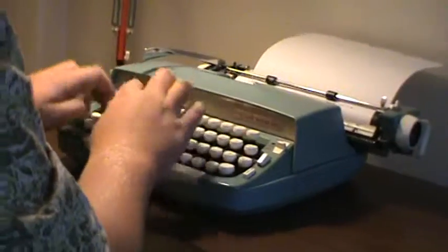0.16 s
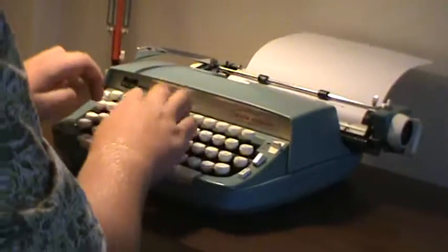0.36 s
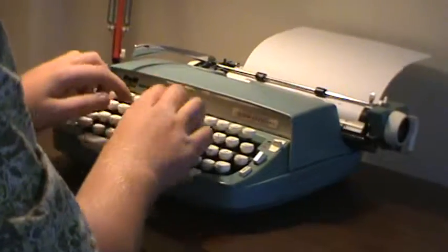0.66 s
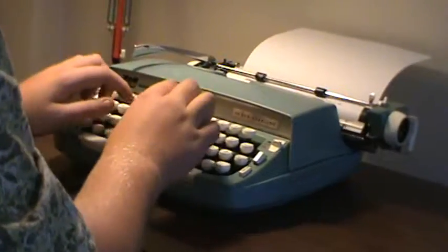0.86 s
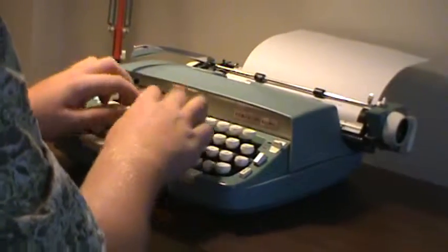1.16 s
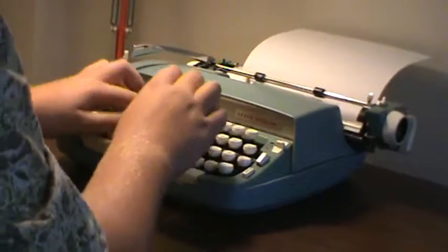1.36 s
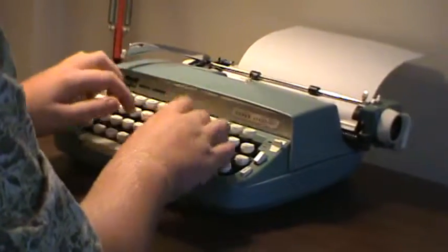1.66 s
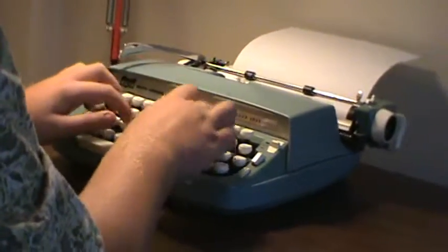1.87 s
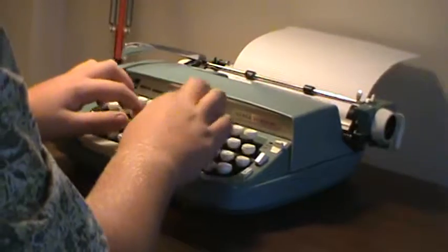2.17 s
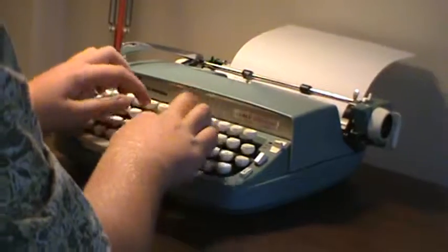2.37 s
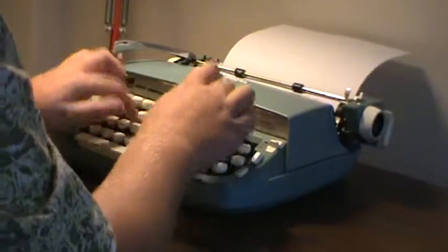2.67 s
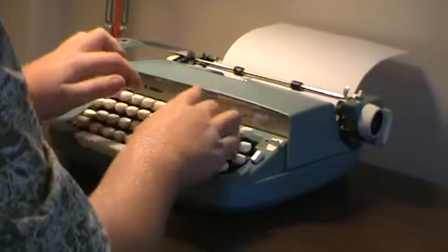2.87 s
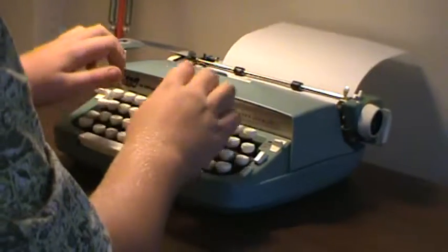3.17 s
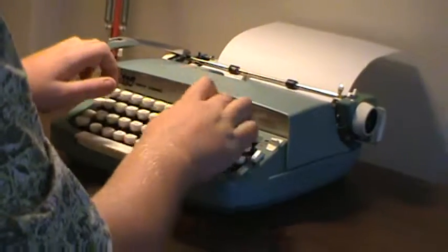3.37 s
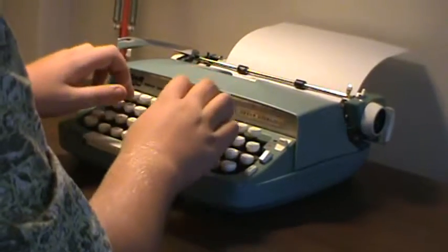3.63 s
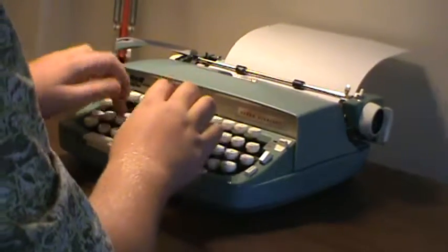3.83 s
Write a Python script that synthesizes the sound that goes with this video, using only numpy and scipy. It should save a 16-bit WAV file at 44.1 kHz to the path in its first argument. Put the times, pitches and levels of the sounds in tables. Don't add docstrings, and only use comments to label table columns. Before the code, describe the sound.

A manual typewriter typed briskly, sharp type slaps with lighter key ticks and carriage clicks between them, two short gaps early, then a steady run that thins near the end; close microphone, small room.

```python
import sys
import numpy as np
from scipy import signal
from scipy.fft import rfft, irfft
from scipy.io import wavfile
from scipy.ndimage import uniform_filter1d, minimum_filter1d

SR = 44100
rng = np.random.default_rng(int(sys.argv[2]) if len(sys.argv) > 2 else 0)


def amplitude_ratio(level_db):
    exponent = np.asarray(level_db, float) / 20
    return 10 ** exponent


def transcribe(signal):
    frames = np.atleast_2d(signal).T
    limited = np.clip(frames, -1, 1)
    pcm = np.round(limited * 32767).astype(np.int16)
    wavfile.write(sys.argv[1], SR, pcm)


N = 176400


def read(points, hz):
    f, value = np.transpose(points)
    return np.interp(np.log(hz + 1), np.log(f + 1), value)


def add(mix, s, sound):
    part = mix[max(round(s * SR), 0):][:len(sound)]
    part += sound[:len(part)]


def colour(x, points):
    hz = abs(np.fft.fftfreq(2048, 1 / SR))
    log_gain = np.log(amplitude_ratio(read(points, hz)))
    minimum_phase = np.exp(np.conj(signal.hilbert(log_gain)))
    taps = np.fft.ifft(minimum_phase).real
    return signal.oaconvolve(x, taps / np.linalg.norm(taps))[:len(x)]


def burst(t60, rise=0.0001, hold=0., size=3000):
    t = np.arange(size) / SR
    shape = np.minimum(t / rise, 1) * amplitude_ratio(-60 * np.maximum(t - hold, 0) / t60)
    x = rng.standard_normal(size) * shape
    for _ in range(6):
        z = rfft(x)
        x = irfft(z / np.sqrt(uniform_filter1d(abs(z) ** 2, size=9) + 1e-20), size)
        x = x / np.sqrt(abs(uniform_filter1d(x ** 2, size=40)) + 1e-12) * shape
    return x / np.linalg.norm(x)


def ring(modes, detune=0.011, vary_db=2.0, size=9000):
    t = np.arange(size) / SR
    out = np.zeros(size)
    for hz, db, t60 in modes:
        louder, sharper, sign = rng.standard_normal(3)
        decay = amplitude_ratio(db + vary_db * louder - 60 * t / min(t60, 0.4))
        out += decay * np.sin(2 * np.pi * hz * (1 + detune * sharper) * t) * np.sign(sign)
    return out


# (t/s, level/dB)
SLAPS = [(0.016, -20.6), (0.2337, -20.0), (0.3021, -21.6), (0.4509, -19.5), (1.0856, -22.5),
         (1.2506, -21.0), (1.3837, -21.3), (1.6988, -23.0), (1.8689, -21.5), (2.0085, -19.6),
         (2.1274, -21.5), (2.2972, -20.0), (2.389, -22.5), (2.511, -19.5), (2.6289, -24.9), (2.7517, -20.1),
         (2.9073, -22.2), (3.0229, -24.6), (3.3778, -29.9), (3.8225, -19.1)]
# (f/Hz, level/dB)
SLAP = [(120, -34), (250, -30), (900, -21), (2900, -13.5), (4800, -6), (5900, -0.5), (8700, -3),
        (10300, -11), (15700, -29), (16500, -47)]
# (f/Hz, level/dB)
TICK = [(120, -32), (220, -11), (500, -6.5), (1200, -2), (2300, -1), (5000, 1), (11000, 0), (15800, -16),
        (16500, -59)]
# (f/Hz, level/dB)
STEP = [(120, -47.5), (250, -24), (900, -14.5), (4670, -6.5), (5830, 6), (9250, 0), (14000, -20),
        (16400, -59)]
# (f/Hz, level/dB, T60/s)
CASE = [(156, -17.5, 0.13), (227, -14, 0.081), (353, -9.5, 0.08), (466.5, -5, 0.065), (542, -3.5, 0.083),
        (699, -5, 0.072), (980, 1.5, 0.0083), (1235, 1.5, 0.021), (1524, 8.5, 0.016), (2138.4, 5.5, 0.0067)]


def type_bars():
    swing_s, step_s, step_end_s, thump_s = 0.0048, 0.031, 0.066, 0.054
    desk = [(60.7, 0, 0.2)]  # f/Hz, level/dB, T60/s
    slap, tick, step, body = np.zeros((4, N))
    t = np.arange(3000) / SR
    step_gate = np.clip((step_end_s - step_s - t) / 0.0054, 0, 1)
    for s, db in SLAPS:
        add(slap, s, amplitude_ratio(db + 37.5) * burst(0.016, rise=0.0001, hold=0.0012))
        add(tick, s - swing_s, amplitude_ratio(db + 18) * burst(0.027, rise=0.0029))
        step_db = 1.87 * db + 45.5
        add(step, s + step_s, amplitude_ratio(step_db) * burst(0.21, rise=0.0039) * step_gate)
        add(body, s + step_s, amplitude_ratio(-37.5) * ring(CASE))
        add(body, s + thump_s, amplitude_ratio(-50) * ring(desk, detune=0.059))
    return colour(slap, SLAP) + colour(tick, TICK) + colour(step, STEP) + body


# (t/s, tick level/dB, case level/dB)
KEYS = [(0.0014, -10, -29), (0.1303, -22.5, -49), (0.1917, -14.5, -49), (0.2233, -43, -26.5),
        (0.4038, -16, -39), (0.5732, -25, -36), (0.6233, -17.5, -28.5), (1.044, -14.5, -36.5),
        (1.0718, -19, -49), (1.2076, -20, -29.5), (1.3489, -18, -37.5), (1.5092, -15, -33),
        (1.66, -12.5, -37), (1.6858, -13, -30), (1.8346, -14.5, -35), (1.9686, -19, -36.5),
        (2.0913, -37, -55), (2.2406, -15, -52), (2.3508, -23, -39), (2.4736, -21, -36.5),
        (2.5909, -21, -41.5), (2.7175, -15.5, -38), (2.8618, -13.5, -36), (3.3074, -17, -36),
        (3.3482, -20.5, -38), (3.4972, -29.5, -32.5), (3.5049, -20.5, -36.5), (3.7859, -14.5, -35.5),
        (3.8128, -34, -51), (3.9494, -25, -39)]


def keys():
    tick, body = np.zeros((2, N))
    for s, db, case_db in KEYS:
        add(tick, s, amplitude_ratio(db + 10) * burst(0.045, rise=0.0014))
        add(body, s, amplitude_ratio(case_db - 8.5) * ring(CASE, detune=0.08))
    return colour(tick, TICK) + body


# (t/s, clack level/dB, low ring level/dB, high ring level/dB)
BARS = [
    (.6945, -2.5, -28.5, -23.5),
    (1.5816, -4, -35, -24),
]
# (f/Hz, level/dB, T60/s)
BAR = [(2010, -2, .03), (2120, -2, .08), (2210, -2, .02), (2345, -5, .03), (3590, -12, .02),
       (3900, -9, .015), (4350, 2, .018), (4670, -5, .02), (4810, 1, .014), (7520, 0, .01)]


def space_bar():
    out = np.zeros(N)
    for s, db, low_db, high_db in BARS:
        clack = amplitude_ratio(db) * colour(burst(0.0384, size=9000), TICK)
        low = amplitude_ratio(low_db) * ring(BAR[:4], detune=0.0034, vary_db=1)
        high = amplitude_ratio(high_db) * ring(BAR[4:], detune=0.0033, vary_db=1)
        add(out, s, clack + low + high)
    return out


# (t/s, level/dB)
PINGS = [
    (0.143, -24),
    (3.153, -14),
]
# (f/Hz, level/dB, T60/s)
SPRING = [(11300, 0, .02), (10900, -2, .012), (11550, -5, .012)]


def spring():
    out = np.zeros(N)
    for s, db in PINGS:
        add(out, s, amplitude_ratio(db - 18) * ring(SPRING, detune=0.003))
    return out


# (f/Hz, level/dB)
RATTLE = [(1000, -28), (3000, -12), (8000, -2), (11000, 1.5), (15500, -9), (16500, -32)]


def rattle():
    from_s, to_s, ticks_per_s = 0.072, 0.16, 180
    busy = np.zeros(N)
    for s, _ in SLAPS:
        add(busy, s + from_s, np.hanning(round((to_s - from_s) * SR)))
    tick_db = -22 + 3.76 * np.minimum(rng.exponential(1, N), 4)
    size = amplitude_ratio(tick_db) * rng.choice([-1., 1.], N)
    ticks = size * np.minimum(busy, 1) * (rng.random(N) < ticks_per_s / SR)
    return colour(signal.oaconvolve(ticks, burst(0.0054, size=300))[:N], RATTLE)


# (f/Hz, side level/dB)
WIDTH = [(60, -36), (110, -31), (200, -21), (380, -15), (700, -11), (1290, -5.5), (2380, -5), (4400, -6.5),
         (8120, -2), (15000, -11)]


def stereo(mid, side):
    hz = np.fft.rfftfreq(len(side), 1 / SR)
    side = irfft(rfft(side) * amplitude_ratio(read(WIDTH, hz)), len(side))
    return np.array([mid + side, mid - side])


# (t/s, level/dB, side share, positive to the left)
ECHOES = [(.0063, .5, .3), (.0123, -.5, -.35), (.0142, -3, .35), (.0195, -5, -.35), (.0220, -.5, .3),
          (.0298, -3, -.3), (.0365, -5, .35)]
# (f/Hz, T60/s)
ROOM = [(60, 0.29), (400, 0.62), (1500, 0.55), (6000, .44), (9000, 0.38), (15000, 0.098)]
# (f/Hz, level/dB)
WALLS = [(200, 9.5), (3000, 6), (6000, 4), (9000, -3), (15000, 6)]


def room(x):
    rise_s, tail_db = 0.011, 3
    hz, t, z = signal.stft(rng.standard_normal((2, SR)), SR, nperseg=256)
    decay = amplitude_ratio(-60 * t / read(ROOM, hz)[:, None])
    tail = signal.istft(z * decay, SR, nperseg=256)[1][:, :SR]
    tail *= 1 - np.exp(-(np.arange(SR) / SR / rise_s) ** 2)
    tail *= amplitude_ratio(tail_db) / np.linalg.norm(tail[0])
    for s, db, side in ECHOES:
        tail[:, round(s * SR)] += amplitude_ratio(db) * np.array([1, side * 2])
    mid, side = signal.fftconvolve(colour(x, WALLS)[None], tail, axes=1)[:, :N]
    return x + stereo(mid, side)


# (f/Hz, level/dB)
HUSH = [(24, -15), (40, 8), (329, -9), (765, -8.5), (1030, -9), (1200, -18), (5700, -18), (7490, -20),
        (15000, -22)]


def hush():
    gain = amplitude_ratio(read(HUSH, np.fft.rfftfreq(N, 1 / SR)))
    x = irfft(rfft(rng.standard_normal((2, N))) * gain, N)
    mid, side = x / x[0].std()
    return amplitude_ratio(-57.5) * stereo(mid, side)


def scene():
    ring_wet = amplitude_ratio(-3)
    desk = type_bars() + keys() + rattle()
    rings = space_bar() + spring()
    return room(desk + ring_wet * rings) + (1 - ring_wet) * rings + hush()


def roll_off(x):
    return signal.sosfilt(signal.butter(12, 16520, fs=SR, output="sos"), x)


def record(dry):
    ceiling_db, ratio, recover_db_per_s = -13, 8, 336
    ahead, hold = round(0.0026 * SR), round(0.002 * SR)
    power = abs(uniform_filter1d((dry ** 2).max(0), size=50))
    peak_db = np.r_[10 * np.log10(power + 1e-12), np.full(ahead, -99.)]
    span = ahead + hold
    peak_db = -minimum_filter1d(-peak_db, span, origin=(span - 1) // 2)[ahead:]
    fall = np.arange(N) * recover_db_per_s / SR
    held_db = np.maximum.accumulate(peak_db + fall) - fall
    over_db = np.maximum(held_db - ceiling_db, 0)
    cut_db = (1 - 1 / ratio) * uniform_filter1d(over_db, size=40)
    rumble_cut = signal.butter(4, 52, "highpass", fs=SR, output="sos")
    top_cut = signal.ellip(8, 0.5, 60, 15900, fs=SR, output="sos")
    heard = signal.sosfilt(np.r_[rumble_cut, top_cut], dry)
    return roll_off(heard / amplitude_ratio(cut_db))


dry = scene()
out = record(dry)
transcribe(out)
```